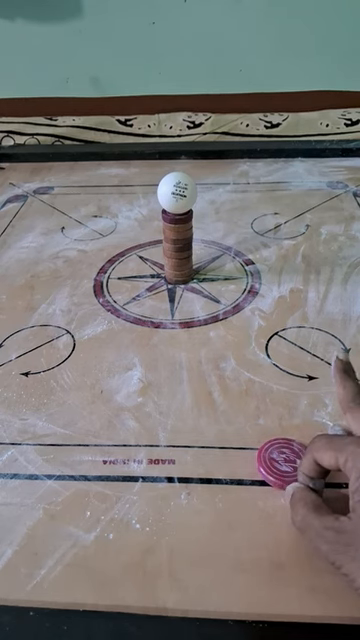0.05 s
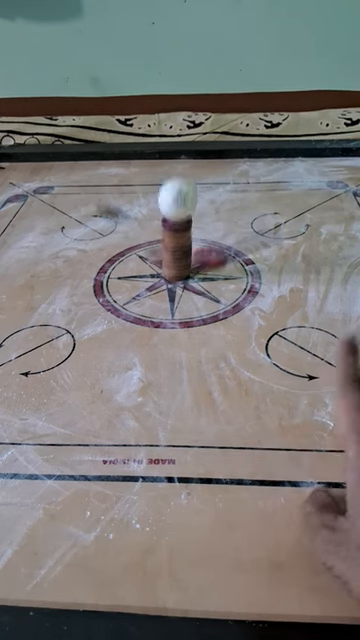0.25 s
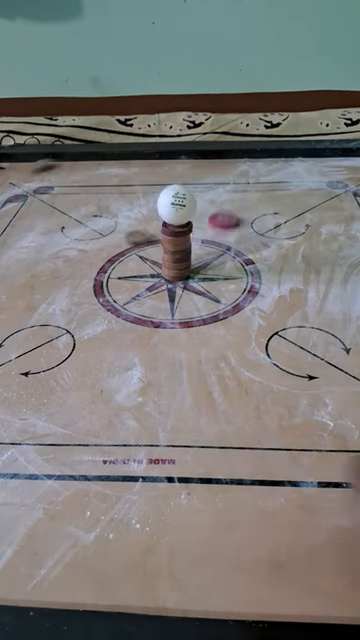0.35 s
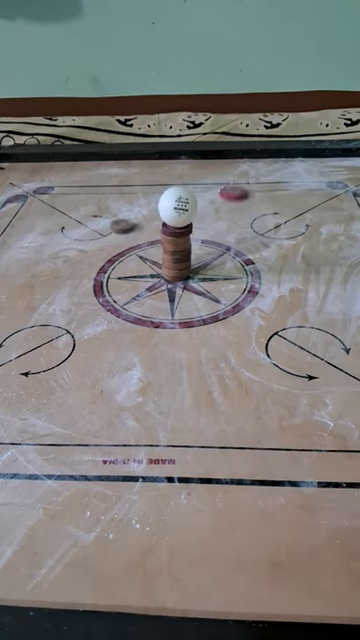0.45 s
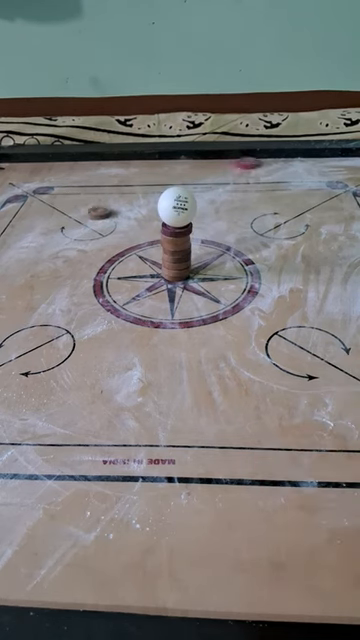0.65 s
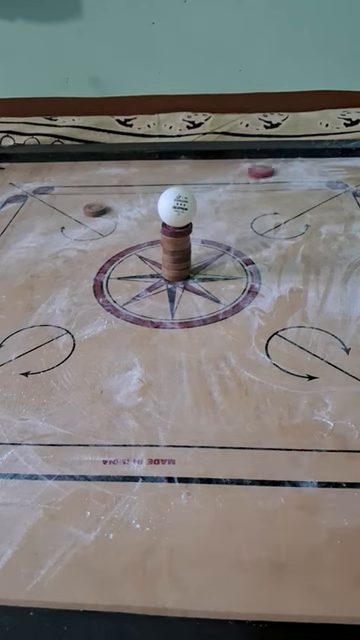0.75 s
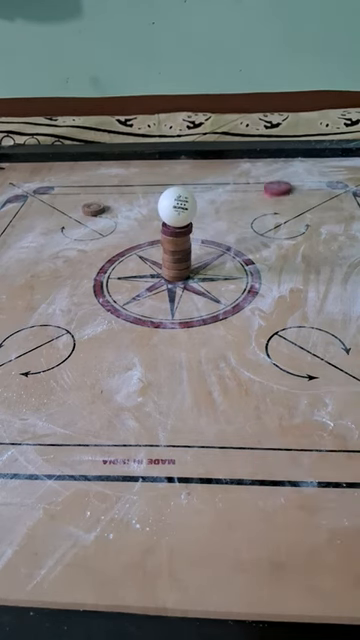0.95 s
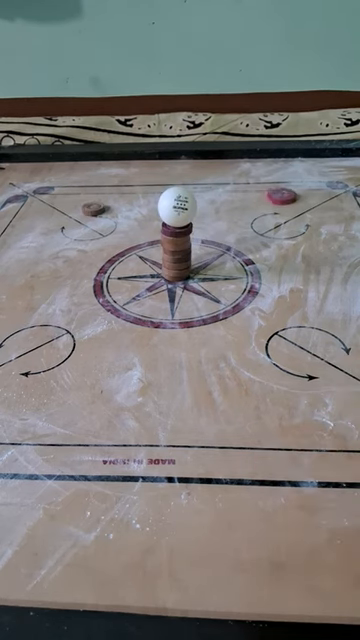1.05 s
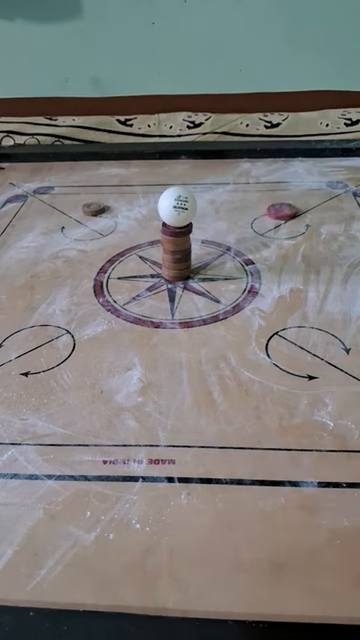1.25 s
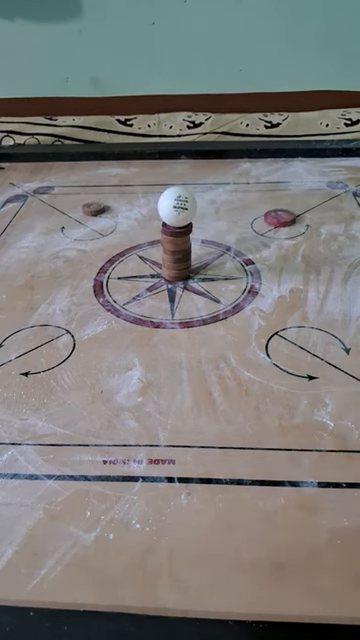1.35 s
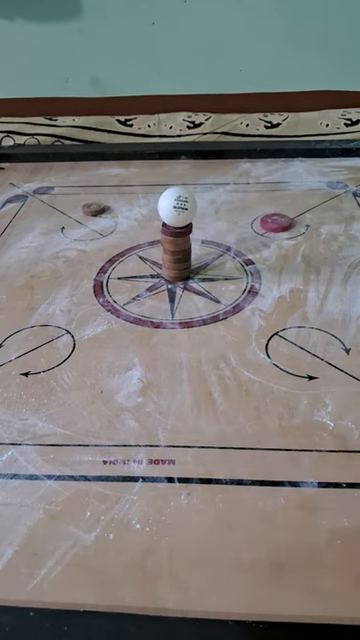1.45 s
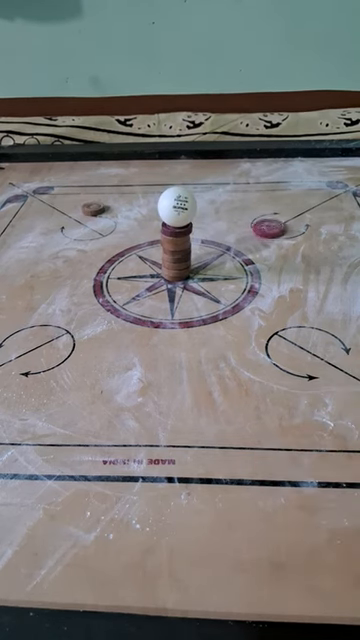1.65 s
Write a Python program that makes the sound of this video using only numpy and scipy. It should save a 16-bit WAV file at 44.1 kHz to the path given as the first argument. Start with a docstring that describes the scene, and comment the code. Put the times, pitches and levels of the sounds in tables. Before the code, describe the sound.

Sharp wooden clacks ring out as a flicked carrom striker hits a stack of coins. The stack chatters, pieces rebound off the frame, and the striker slides softly to rest, heard close up in a small quiet room.

```python
"""A carrom shot in a small quiet room, heard by a phone's two microphones at the near edge of the board.
A finger flicks the striker, which scrapes over the powdered wood and knocks the bottom coin from a stack.
The stack drops and chatters; striker and coin then clack off the frame, and the plywood rings and thuds.
Last, the striker slides to rest, its scrape sinking in pitch, and leaves the faint hum of the room."""
import sys
import numpy as np
from scipy import signal
from scipy.fft import rfft, irfft
from scipy.io import wavfile
from scipy.ndimage import map_coordinates

SR = 44100
rng = np.random.default_rng(int(sys.argv[2]) if len(sys.argv) > 2 else 0)


def wav_record(signal):
    """Record a signal, one row per channel, as 16-bit PCM in the file named by sys.argv[1]."""
    frames = np.transpose(np.atleast_2d(signal))
    bounded = np.clip(frames, -1, 1)
    # unit amplitude maps onto the largest positive 16-bit level
    quanta = np.round(bounded * 32767).astype(np.int16)
    wavfile.write(sys.argv[1], SR, quanta)


N = 74970
T = np.arange(N) / SR
HZ = np.maximum(np.fft.rfftfreq(N, 1 / SR), 1)

# blows on the board; the finger lets go at 0.21 s, the striker meets the stack at 0.30 s:
# t/s, level/dB, bass/dB, bite/dB, treble/dB, after-ring/dB, left-right/dB, favoured f/Hz, its boost/dB
BOARD_KNOCKS = [ (.2100, -4, 10.5, -26, -24, 5, 5, 1180, 4.5),
                (.2200, -3, 16, -14, -14, -4.5, -4.5, 275, 7),
                (0.2246, 3.5, 9.5, -12, 1, -1, -2.5, 1880, 5),
                (0.2286, 5, 8.5, -18.5, -5, -11.5, -2, 269.7, 13.5),
                (0.2576, 2.5, -2, 1, 9.5, -4, -4, 4170, 5.5), (0.2996, 15, 1, 1, 2, 4, 1, 479, 7.5),
                (0.3489, 10.5, 5, 7.5, 4.5, 1, -2.5, 513, 5.5),
                (0.3518, 12.5, -4.5, -18, -7, 3.5, 0, 1035, 1),
                (0.445, 2.5, 6, -15, -4.5, 4, -4.5, 620, -4.5), (0.5227, -4.5, 6, 2, -20, -7, 1.5, 2400, 8),
                (0.554, 1, 1, -2.5, -2.5, 1, 1, 2540, 7.5),
                (0.6076, 10.5, -5, -17, -12.5, -2, -6, 1750, -2.5),
                (.6440, 6, -15.5, -19, -11, -17, 2, 1320, 11.5)]
# modes of the coins: f/Hz, level/dB, t60/s
COIN_MODES = [(1573, 1.5, .08), (3840, 1.5, 0.1), (4150, 6.5, 0.053), (4920, 3.5, 0.044), (10500, 3.5, .03)]
def knocks():
    """Finger, striker and coin knock on the board, coloured by the coins' resonances."""
    return blows(BOARD_KNOCKS, resonances(COIN_MODES))


# discs hit the frame, last the striker on the side far from the microphones: columns as in BOARD_KNOCKS
FRAME_HITS = [ (0.4547, 16.5, 1.5, 7.5, 0, -6, 2.5, 5200, 2.5),
              (0.6008, 9.5, -1, -2.5, -21.5, -1, 1, 2050, 5),
              (0.7238, 19, -4, -0.5, -13, -5.5, 6.6, 1800, 3)]
# modes of the wooden frame: f/Hz, level/dB, t60/s
FRAME_MODES = [(1260, 6, .04), (1550, -9.5, 0.02), (2156, 3, 0.018), (2560, 4, 0.037), (3394, 5.5, 0.031),
               (5140, 2.5, 0.028)]
def rebounds():
    """Discs bounce off the frame and ring it."""
    return blows(FRAME_HITS, resonances(FRAME_MODES))


# spectrum of a wooden knock: f/Hz, level/dB
WOOD_COLOUR = [(30, -34), (70, -17.5), (150, -12.5), (230, -5), (350, -1.5), (650, -1.5), (1200, 1),
               (2200, -3.5), (4000, -6.5), (5200, -9.5), (6500, -13.5), (10000, -11.5), (13000, -19),
               (16000, -35)]
def blows(table, body_db, favour_octaves=0.27):
    """Single blows on wood, each with its own brightness; each spot favours one resonance."""
    out = 0
    for row, (early, late) in zip(table, contacts(len(table))):
        s, db, bass, bite, treble, ring, pan, hz, boost = row
        tone = over_hz([(380, bass), (1320, 0), (3890, bite), (7900, treble)])
        favoured = boost * np.exp(-.5 * (np.log2(HZ / hz) / favour_octaves) ** 2)
        blow = causal(db + over_hz(WOOD_COLOUR) + body_db + tone + favoured) * delay(s)
        out = out + blow * (early * balance(pan) + undb(ring) * late)
    return irfft(out, N)


# spectrum of the stack landing: f/Hz, level/dB
CHATTER_COLOUR = [(40, -24), (150, -18.5), (380, -1), (650, -7.5), (1050, -0.5), (1600, -4.5), (2300, -9),
                  (4000, -8), (6500, -15.5), (10000, -7.5), (13000, -16), (16000, -22.5)]
def stack_drop(start_s=.3605, rise_s=0.0081, fall_s=0.0094, coins=6, clicks_per_s=1200):
    """Right of centre, the stack lands and tiny collisions run through its coins, each with its ring."""
    age = np.maximum(T - start_s, 0)
    env = np.sqrt(np.minimum(age / rise_s, 1)) * np.exp(-np.maximum(age - rise_s, 0) / fall_s)
    out = 0
    for early, late in contacts(coins):
        clicks = env * (rng.random(N) < clicks_per_s / SR) * rng.standard_normal(N)
        ring = early * balance(-4) + undb(0.5) * late
        out = out + rfft(unit(clicks) / np.sqrt(N * coins)) * ring
    return irfft(out * causal(20.5 + over_hz(CHATTER_COLOUR) + resonances(COIN_MODES)), N)


# short rings of disc and frame, then modes of the playing surface: f/Hz, level/dB, t60/s
CLACK_MODES = [(772, -10, 0.012), (1400, -7.5, .016), (2290, 1, 0.029), (2660, 3, 0.045), (3600, 9, 0.025),
               (3930, 10, .012), (5500, 13, 0.015)]
BOARD_MODES = [(187, 2, 0.57), (229.6, -10.5, 0.34), (340, 7.5, 0.98), (378.4, 8.5, 0.27),
               (403.3, -6, 0.064), (464.7, -1.5, 0.39), (540, 5.5, 0.75), (652, 5, 0.37), (833.4, 7, 0.37),
               (924.3, 7, 0.19), (999, 4.5, 0.33), (1037, -1.5, 0.091), (1510, 2.5, 0.074)]
# decay of the first crack, the plywood's dense ring and the room: f/Hz, t60/s
CRACK_T60 = [(300, 0.0017), (1500, 0.025), (4000, 0.0043), (10000, 0.0048)]
PANEL_T60 = [(150, 0.091), (600, 0.0916), (1400, 0.027), (3000, 0.026), (10000, 0.011)]
ROOM_T60 = [(100, 0.31), (400, 0.78), (1000, 0.13), (2500, 0.26), (6000, 0.25), (13000, 0.24)]
def contacts(count):
    """Each contact at the microphones: clack and crack first, then the ring of plywood, board and room."""
    clack = (undb(-12) + undb(-11) * modes(CLACK_MODES)) * mic_delays() * bending()
    crack = undb(-4) * tails(CRACK_T60, count, build_s=0.000099)
    plywood = undb(-2) * tails(PANEL_T60, count, build_s=0.0021)
    board = undb(2) * modes(BOARD_MODES)
    room = undb(-3.5) * tails(ROOM_T60, count, build_s=0.0024)
    return zip(clack + crack, plywood + board + room)


def bending(travel_s=0.001778):
    """Bending waves disperse on their way to the board's edge: the treble arrives first, the bass trails."""
    dispersion = np.exp(-4j * np.pi * travel_s * np.sqrt(1000 * HZ))  # travel_s holds at 1 kHz
    return dispersion * delay(-travel_s / 3)


# low thuds of the board: t/s, f/Hz, level/dB, t60/s
BOARD_THUDS = [(0.376, 91.6, -35, 0.12), (.457, 190, -33.5, 0.1), (0.729, 169, -32, 0.098)]
def thuds(rise_s=0.00078):
    """Heavy blows rock the whole board."""
    out = 0
    for s, hz, db, t60 in BOARD_THUDS:
        age = np.maximum(T - s, 0)
        env = undb(db - 60 * age / t60) * (1 - np.exp(-age / rise_s))
        out = out + env * np.sin(2 * np.pi * hz * age)
    return out


# course of the slide: t/s, scrape level/dB, powder hiss level/dB
SLIDE_LEVELS = [(0.203, -61.5, -74), (0.22, -45.5, -42.5), (.29, -44.5, -39), (.5, -40, -41.5),
                (.58, -39, -45.5), (.71, -41, -42), (0.79, -39.5, -58), (0.831, -47.5, -48.5),
                (.89, -48.5, -53), (.955, -41, -49.5), (1.021, -46, -54), (1.25, -46.5, -57),
                (1.441, -49.5, -62.5), (1.58, -54.5, -72), (1.7, -62, -67.5)]
# spectra of disc scrape, powder hiss and board rumble: f/Hz, level/dB
SCRAPE_COLOUR = [(150, -25), (400, -22.5), (700, -4.5), (950, 0), (1400, -4), (2100, -16.5), (4000, -31.5),
                 (9000, -51)]
HISS_COLOUR = [(500, -8), (1450, 5.5), (2000, 9.5), (3500, 5), (5500, 0), (8000, 0.5), (12500, -2.5),
               (15000, -7), (16000, -30)]
RUMBLE_COLOUR = [(30, -39.5), (70, -21), (110, -6), (160, -10.5), (260, -11.5), (345, 7.5), (420, -3.5),
                 (520, 3.5), (750, -14.5), (1500, -29.5)]
def sliding(stop_s=1.61, fade_s=0.049, grain_db=1.5, grains_per_s=290):
    """Discs scrape over grains of powder and make the board rumble; the hiss fades first as they slow."""
    times, scrape_levels, hiss_levels = np.array(SLIDE_LEVELS).T
    scrape_db, hiss_db = np.interp(T, times, scrape_levels), np.interp(T, times, hiss_levels)
    grip = unit(undb(grain_db * walk(grains_per_s)))
    moving = np.interp(T, [times[0], times[1], stop_s, stop_s + fade_s], [0, 1, 1, 0])
    rumble_db = -52.5 + 0.17 * (scrape_db + 47)  # follows the scrape only weakly
    rumble = moving * undb(rumble_db) * noise(RUMBLE_COLOUR)
    scrape = undb(scrape_db) * slowed(noise(SCRAPE_COLOUR, resonances(BOARD_MODES)), stop_s)
    hiss = undb(hiss_db) * noise(HISS_COLOUR)
    return grip * (scrape + hiss) + rumble


def slowed(rubbing, stop_s, from_s=1.15, end_pitch_ratio=0.86):
    """The rubbing sinks in pitch as the striker loses speed."""
    place = np.cumsum(np.interp(T, [from_s, stop_s], [1, end_pitch_ratio]))
    return np.array([map_coordinates(channel, [place], mode="mirror") for channel in rubbing])


# spectrum of the quiet room: f/Hz, level/dB
HUM_COLOUR = [(25, -33.5), (60, -4.5), (220, 6), (330, 11), (420, 0), (600, -0.5), (820, -4.5), (1100, -24),
              (2200, -19), (5500, -49), (15000, -41)]
def room_hum():
    """Room tone: a faint, steady low noise around the board."""
    return undb(-58) * noise(HUM_COLOUR)


# how unlike the two microphones sound: f/Hz, side share/0-1
MIC_SPREAD = [(35, 0.5), (100, 0.05), (300, 0), (700, 0.42), (1400, 0.33), (3000, 0.69), (12000, 0.41)]
def mic_pair():
    """Spectrum of white noise at the two microphones, most alike in the upper bass."""
    mid, side = rfft(rng.standard_normal((2, N)))
    share = over_hz(MIC_SPREAD)
    return (mid * np.sqrt(1 - share) + side * np.sqrt(share) * np.array([[1], [-1]])) * mic_delays()


def mic_delays(lag_s=0.00007):
    """Sound reaches the right microphone just after the left."""
    return np.array([delay(0), delay(lag_s)])


def balance(db):
    """Microphone gains for a level of left minus right."""
    return undb([[db / 2], [-db / 2]])


def noise(colour, body_db=0):
    """Stereo noise of a given colour, heard through a resonant body, rms 1."""
    return unit(irfft(mic_pair() * undb(over_hz(colour) + body_db), N))


def tails(t60s, count, build_s):
    """Responses of diffuse rings, each octave dying at its own rate."""
    centres = np.geomspace(60, 15360, 9)
    white, size = mic_pair(), N // 3
    starts = rng.integers(0, N - size, count)
    out = np.zeros((count, 2, size))
    for hz, weights in zip(centres, np.eye(len(centres))):
        band = irfft(white * np.interp(np.log(HZ), np.log(centres), weights), N)
        env = undb(-60 * T[:size] / over_hz(t60s, hz)) * (1 - np.exp(-T[:size] / build_s))
        out += np.array([band[:, s:s + size] for s in starts]) * env / np.sqrt(np.sum(env ** 2))
    return rfft(out, N)


def modes(table):
    """Response of damped resonances; dB is the height of each peak."""
    ring = 0
    for hz, db, t60 in table:
        gain = undb(db) * 2 * np.log(1000) / (t60 * SR)
        ring = ring + gain * np.sin(2 * np.pi * hz * T) * undb(-60 * T / t60)
    return rfft(ring)


def resonances(table):
    """Gain in dB of a body that passes every tone and lifts those near its modes."""
    return 10 * np.log10(1 + sum(np.abs(modes([mode])) ** 2 for mode in table))


def causal(db):
    """Minimum-phase response with the given gain."""
    cepstrum = irfft(np.log(undb(db)), N)
    cepstrum[1:N // 2] *= 2
    cepstrum[N // 2 + 1:] = 0
    return np.exp(rfft(cepstrum))


def delay(s):
    """Response of a plain delay."""
    return np.exp(-2j * np.pi * HZ * s)


def walk(rate):
    """Smooth random wander, rms 1."""
    return unit(np.interp(T * rate, np.arange(N // 8), rng.standard_normal(N // 8)))


def over_hz(points, hz=HZ):
    """Read (f/Hz, value) points on a log-frequency axis."""
    freqs, values = np.array(points, float).T
    return np.interp(np.log(hz), np.log(freqs), values)


def undb(db):
    """Decibels to gain."""
    return 10 ** (np.asarray(db) / 20)


def unit(x):
    """Scale to rms 1."""
    return x / np.sqrt(np.mean(x ** 2))


def scene():
    """The shot from the near edge of the board, over the hum of the room."""
    return knocks() + rebounds() + stack_drop() + thuds() + sliding() + room_hum()


def record(dry):
    """The phone rounds the highest peaks and cuts the top."""
    ceiling, top_hz = .9, 15600
    rounded = dry / (1 + (dry / ceiling) ** 6) ** (1 / 6)
    return signal.sosfilt(signal.ellip(8, .2, 70, top_hz, fs=SR, output="sos"), rounded)


dry = scene()
out = record(dry)
wav_record(out)
```